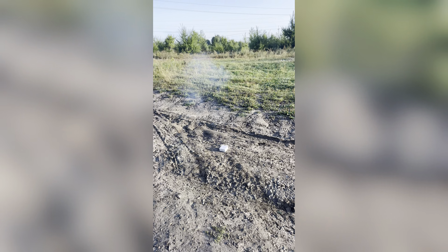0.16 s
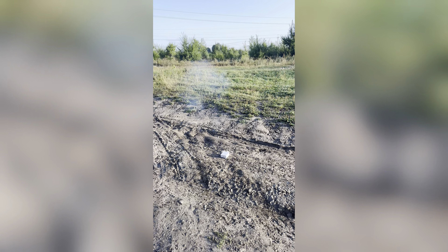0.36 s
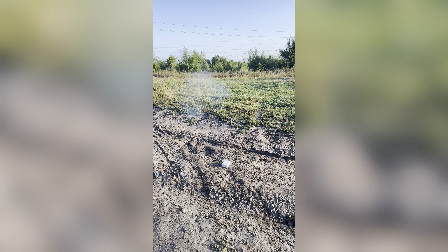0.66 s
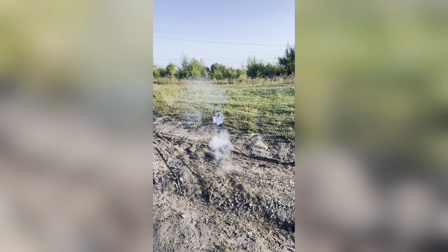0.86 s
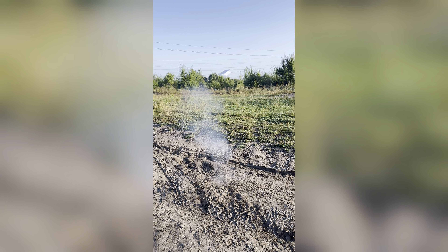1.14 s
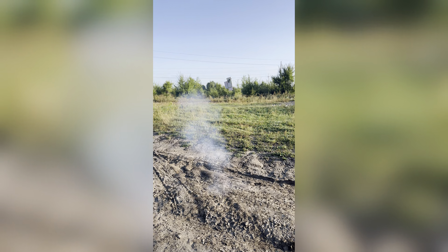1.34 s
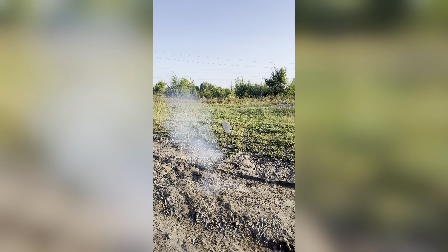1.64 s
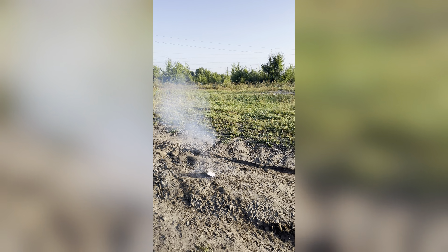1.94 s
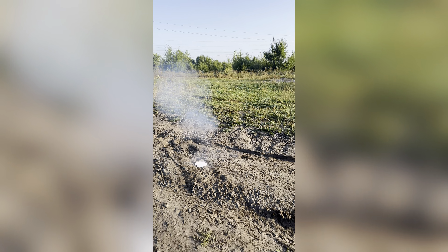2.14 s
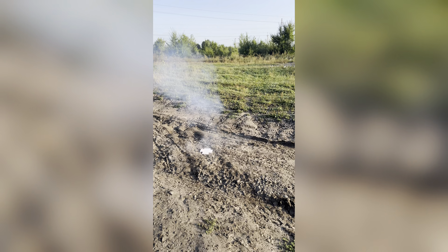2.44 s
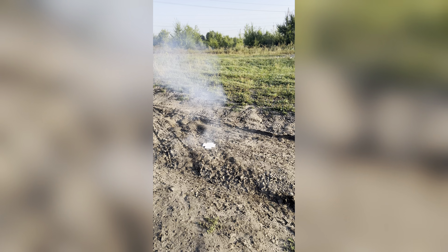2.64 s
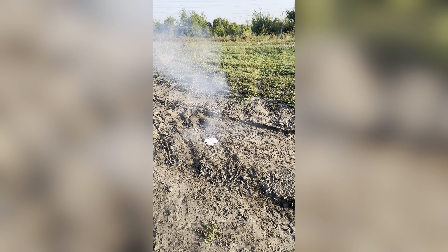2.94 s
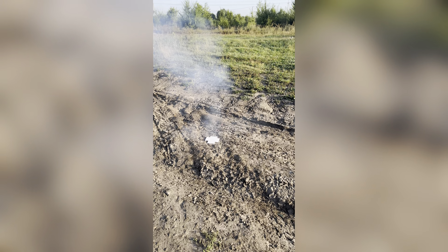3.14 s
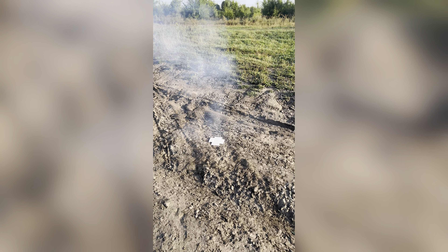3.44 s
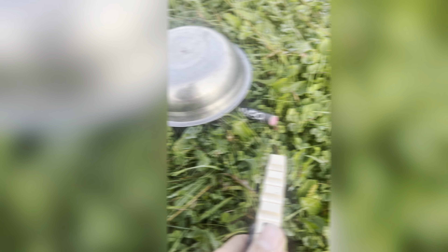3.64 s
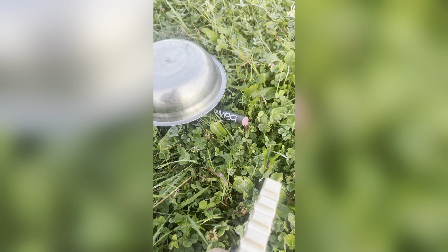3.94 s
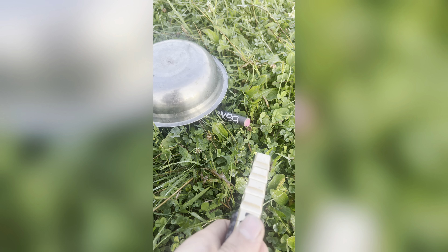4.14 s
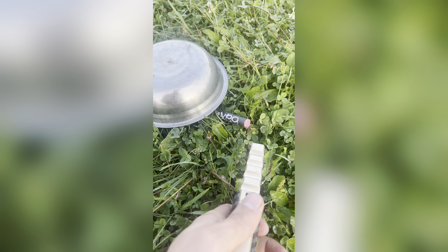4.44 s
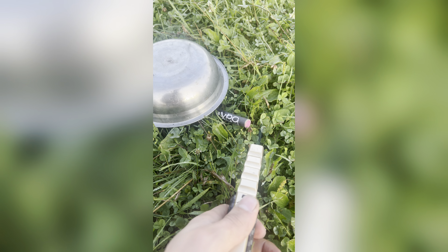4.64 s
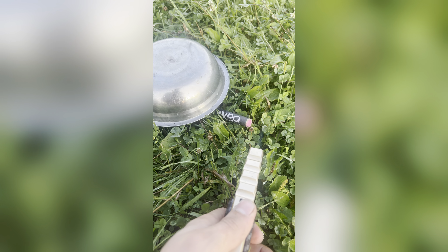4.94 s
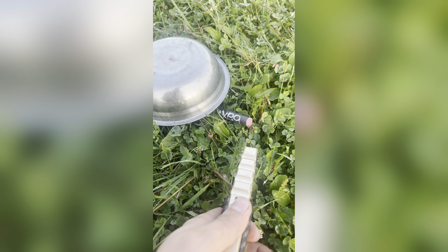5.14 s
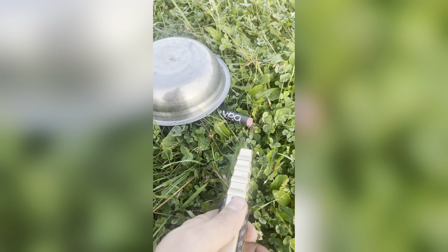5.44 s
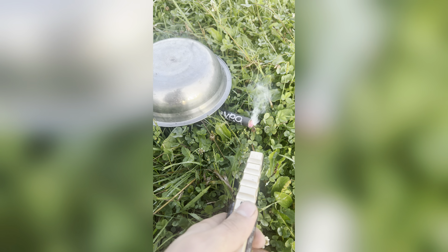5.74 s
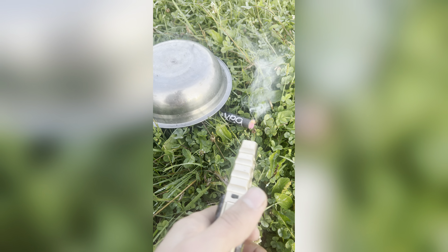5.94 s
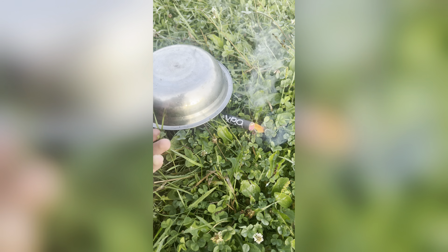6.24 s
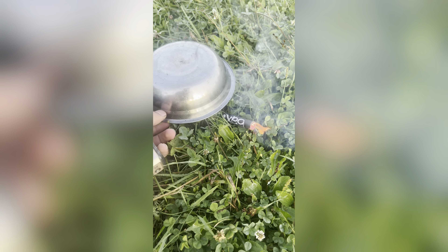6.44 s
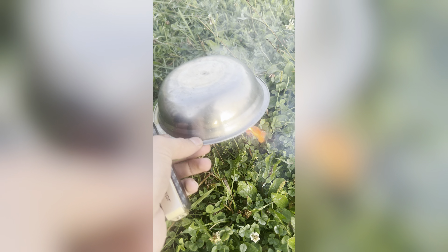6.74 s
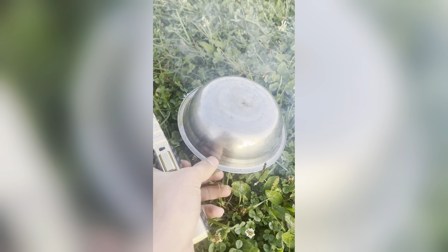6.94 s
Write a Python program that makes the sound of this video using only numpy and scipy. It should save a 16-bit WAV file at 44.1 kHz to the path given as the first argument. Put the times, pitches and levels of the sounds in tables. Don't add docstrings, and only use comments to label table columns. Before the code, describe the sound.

A phone outdoors catches far engine rumble and small birds before a firecracker explodes beneath a thin metal lid, slightly overloading the microphone. A dull echo spreads and fades; the lid lands with knocks and crumbling soil. The scene cuts to a close spot: sharp lighter click, steady windy jet flame, short second hiss, then bright sputtering fuse fizz, turning hollower as the bowl covers it.

```python
import sys
import numpy as np
from scipy import signal
from scipy.fft import rfft, irfft, next_fast_len
from scipy.io import wavfile
from scipy.ndimage import uniform_filter1d, map_coordinates

SR = 44100
rng = np.random.default_rng(int(sys.argv[2]) if len(sys.argv) > 2 else 0)


def linear_from_db(decibels):
    return 10 ** (np.asarray(decibels, float) / 20)


def inscribe(sig):
    pcm = np.round(np.clip(np.atleast_2d(sig).T, -1, 1) * 32767)
    wavfile.write(sys.argv[1], SR, pcm.astype(np.int16))


N = 312669
TIME = np.arange(N) / SR
WHOLE = [(0,), (N / SR,)]
TOP_HZ = 15850
BANG_S, MOVE_S = 0.79, 3.515

# frequency_hz, level_db [per Hz]
ENGINE_SPECTRUM = [(13, -57), (22, -31), (36, -12), (59, 3), (86, -3.5), (119, -7), (200, -17.5),
                   (260, -52), (440, -120)]
ROAD_SPECTRUM = [(110, -33), (180, -5.5), (199, -8), (236, 0.5), (301, -9), (338, -4), (373, -7),
                 (469, -3.5), (574, -6), (844, -3.5), (1540, -12.5), (1940, -21), (2810, -29), (3960, -35),
                 (5500, -45), (7150, -75), (12100, -120)]
GRASS_SPECTRUM = [(76, -35), (130, -9.5), (285, -5.5), (351, -16.5), (387, -12.5), (433, -15.5),
                  (1390, -25.5), (1860, -24.5), (3060, -42), (3420, -46), (6000, -60), (7800, -92),
                  (13200, -120)]
INSECT_SPECTRUM = [(1760, -44.5), (3000, -15.5), (3350, -10.5), (3500, 2), (3650, -10.5), (4280, -10),
                   (4810, -24), (5300, -26.5), (6460, -2.5), (6950, -2.5), (7760, -2), (9680, -17.5),
                   (12500, -23.5), (14000, -50.5)]
# frequency_hz, side_minus_mid_db
FAR_SIDE = [(60, -19), (180, -15), (550, -2), (1650, -4), (4970, 2.5), (15000, -9.5)]
NEAR_SIDE = [(60, -26), (110, -54), (200, -17.5), (380, -17), (700, 2), (1290, -11.5), (2380, -2),
             (4400, -5), (8120, -4.5), (15000, -2.5)]
ENGINE_DB, ROAD_DB, GRASS_DB, INSECTS_DB = -52.5, -56, -57.5, -82
DUCK_DB, DUCK_FULL_S, DUCK_HOLD_S, DUCK_BACK_S = -19, .12, 0.056, 0.13
FIELD_LEFT_DB, ECHO_LEFT_DB = .5, 0.9

# length_s, start_hz, end_hz, bend [above 1 the glide comes early], droop_hz
SLIDE = (.115, 7330, 6500, 1.3, 50)
ARCH = (.066, 3500, 4750, 2.0, 500)
CHIP = (0.034, 2700, 4250, 1.71, 30)
# start_s, level_db, glide_share [part of the glide sung], stretch [ratio]
SLIDE_NOTES = [
    (.022, -73, .45, .8),
    (.165, -69.5, .98, .92),
]
ARCH_NOTES = [
    (.33, -76, 0.95, .95),
    (.478, -79, 1, 0.94),
    (.625, -80, 0.92, 0.92),
]
CHIP_NOTES = [
    (2.474, -82, .9, .6),
    (2.5, -68.5, 1, 0.9),
    (2.665, -81, .9, .6),
    (2.697, -71, 0.74, 1.2),
    (2.745, -82, .35, .7),
    (2.886, -71, .5, 0.4),
]

# start_s, rms_db, centre_hz, width_octaves, t60_s
CLODS = [(.283, -66, 2900, 0.66, .15), (.292, -65, 2500, 0.27, .1), (.7, -72, 4000, .2, .03),
         (1.683, -70, 7500, .2, .03), (1.803, -68, 7960, 0.37, .03), (1.856, -66, 8000, 0.43, .054),
         (1.939, -51, 1100, .6, .025), (1.957, -60, 5000, 1.1, 0.04), (1.965, -61, 6000, 1, .05),
         (2.006, -57, 2900, .6, .012), (2.03, -38.5, 900, 0.7, 0.031), (2.029, -63, 6000, 1, 0.04),
         (2.034, -56, 3800, .6, .04), (2.037, -46.5, 1920, 0.26, 0.043), (2.0565, -34, 4100, 1.2, 0.018),
         (2.06, -41, 3000, 1.3, .018), (2.064, -55, 6100, 0.098, .07), (2.0805, -44.5, 3100, 0.76, 0.022),
         (2.085, -49, 4000, 1.4, 0.022), (2.101, -53, 5500, .35, .02), (2.106, -52, 1500, .8, 0.022),
         (2.109, -54, 5800, .5, .03), (2.118, -61, 5800, .4, 0.026), (2.152, -63, 4800, .3, .03),
         (2.179, -61, 3500, .5, .015), (2.184, -57, 3020, 0.5, 0.02), (2.281, -69, 2800, .7, .012),
         (2.552, -63.5, 2800, .5, .015), (2.653, -66, 2810, .3, .012), (2.765, -65, 7980, .7, 0.018),
         (2.848, -70, 4000, .2, .012), (2.867, -62, 2000, 0.72, 0.017), (3.039, -65, 3494, 0.31, .012),
         (3.471, -70, 7500, .25, .012), (3.507, -64, 4950, 1.1, 0.012), (4.388, -72, 3696, .4, 0.013)]
# start_s, rms_db, centre_hz, width_octaves, t60_s
RUSTLES = [
    (1.82, -65.5, 8550, .6, 0.18),
    (1.957, -41.5, 495, 1.7, 0.089),
    (2.1, -62.5, 5600, 1.0, 0.34),
    (3.74, -77.5, 3680, .3, .5),
    (6.452, -44, 6800, 0.29, .06),
    (6.583, -45, 6000, .8, .05),
    (3.42, -73, 3940, 1.18, 0.66),
    (6.6, -42.5, 514, 0.34, 0.16),
]
# start_s, level_db, pitch_hz, glide_octaves, t60_s
LANDING = [
    (1.9336, -38, 1050, -.2, .018),
    (1.9512, -37, 330, -.12, .045),
    (1.9592, -31, 400, -0.28, .045),
    (2.0292, -30, 510, -1.5, 0.017),
    (2.0586, -20, 1200, -.12, 0.015),
]

# start_s, rms_db, centre_hz, width_octaves, t60_s
FORERUNNER = [
    (.731, -55, 3580, .9, .3),
    (.751, -46, 3493, 0.96, .04),
]
# start_s, rms_db, centre_hz, width_octaves, t60_s
BLAST = [
    (.757, -14.5, 1402, 1.6, .015),
    (.7575, -26, 4604, 0.45, 0.012),
    (.764, -18, 280, 0.56, 0.04),
    (.792, -35, 2800, 0.75, .03),
    (1.2752, -37, 696, .7, .035),
]
# start_s, rms_db, centre_hz, width_octaves, t60_s
CRACK = [
    (.7625, -13.5, 3600, 1.44, 0.012),
    (.7626, -28, 8600, 0.79, .012),
    (1.9338, -47.5, 1800, 2.5, .02),
]
# start_s, level_db, pitch_hz, glide_octaves, t60_s
BOOM = [
    (.7562, -6, 2200, -.089, .018),
    (.7545, -8.5, 760, .2, .03),
    (.7615, -8.5, 1642, 0.073, 0.019),
    (.7632, 1.5, 800, -0.75, .016),
    (.7535, -21.5, 7000, .02, 0.02),
    (.7622, -14, 4900, .01, .014),
    (.7615, -18.5, 7100, .01, .009),
    (.7525, -16.5, 1500, .1, .02),
    (.766, -15, 61, -.3, 0.1),
    (.832, -19, 52, 0.042, 0.2),
]
# start_s, level_db, t60_s, leafiness_db
WALLS = [
    (0.77, -37, 0.34, 1),
    (0.789, -39.5, 0.1, -1),
    (.955, -57.5, 0.33, 11.5),
    (.995, -54, 4.5, 1),
    (1.04, -55.5, 6, 2.5),
    (1.125, -45.5, 3.9, 3),
    (1.385, -53, 0.48, 13),
]
# start_s, rms_db, centre_hz, width_octaves, t60_s
PEALS = [
    (.865, -61, 2700, .2, .2),
    (.972, -59, 6050, .13, .12),
    (.972, -62, 3900, .15, .08),
    (1.12, -58.5, 6100, .13, .2),
    (1.133, -57, 4000, .12, .1),
    (1.19, -45, 550, .5, .06),
    (1.236, -47, 500, 0.45, .06),
    (1.274, -56, 3400, 0.46, .04),
    (1.37, -57, 2350, .1, .06),
    (1.41, -58, 4600, .5, .3),
]
# frequency_hz, level_db [per Hz]
ROLL_SPECTRUM = [(76, -41.5), (130, -13.5), (161, -25), (271, -1.5), (308, -2.5), (706, 2), (1250, -17),
                 (2200, -22), (2860, -51), (4840, -120)]
CRACKLE_SPECTRUM = [(1300, -45), (2000, -14), (2490, 3.5), (2840, 1), (3100, -2), (3990, 3.5), (5200, -9.5),
                    (6760, -40.5), (11400, -120)]
LEAVES_SPECTRUM = [(2820, -34.5), (4800, -4.5), (5450, -4), (6270, 1.5), (7210, -9.5), (8500, -15.5),
                   (11000, -41), (18700, -120)]
AIR_SPECTRUM = [(4590, -30.5), (7800, -1.5), (8990, -3.5), (11500, -2.5), (15800, -10.5)]
# over_roll_db, air_loss_db [per s], leafiness_share
CRACKLE_WAY = (-5, 13, 0.53)
LEAVES_WAY = (-9.5, 29, 1.12)
AIR_WAY = (-6, 22, .3)
SOAK_DB_PER_S = 58
HAZE_DB, HAZE_T60_S = -64.5, 2.6
PEAL_RISE_S, PEAL_SPREAD = 0.0043, .05

# time_s, hiss_db
PRESS = [
    (4.495, -89),
    (4.503, -66),
    (4.509, -48.5),
    (4.56, -39),
    (5.136, -39),
    (5.374, -41),
    (5.552, -40),
    (5.6, -51),
    (5.612, -71),
]
AGAIN = [
    (5.626, -51.5),
    (5.678, -49.5),
    (5.832, -42.5),
    (5.868, -43),
    (5.886, -48.5),
    (5.915, -79),
]
# frequency_hz, level_db [per Hz]
COLD_JET = [(530, -64), (900, -19), (1100, -36), (1320, -37), (2780, -14), (3170, -21), (3840, 5),
            (4820, -6.5), (7880, 0.5), (10000, -14), (10900, -1), (11900, -20), (12600, -32), (13300, -16),
            (15800, -14)]
FRESH_JET = [(1760, -37), (3000, -14), (3260, -34.5), (3910, 2.5), (4070, -2.5), (4370, -15.5), (5230, -18),
             (6310, -13), (7300, -2), (8160, -11), (8940, -13), (10900, -7), (12800, -23), (14300, -17),
             (15800, -24)]
WARM_JET = [(1760, -26), (3000, -1), (3400, -20.5), (3990, 2), (4950, -13), (6810, -5), (8690, -5),
            (9450, -10), (10300, 0.5), (11300, -5), (12200, -17), (14400, -11.5), (15800, -19)]
# frequency_hz, level_db [per Hz]
ROAR_SPECTRUM = [(41, -55), (70, -13), (109, -5.5), (189, -0.5), (312, 1), (379, -1), (560, 0),
                 (775, -15.5), (912, -8), (1070, -11.5), (1260, -21.5), (1560, -14.5), (2660, -14.5),
                 (3240, -32.5), (3400, -24), (4420, -56), (7480, -120)]
LIT_S, OUT_S = 4.57, 5.566
ROAR_DB, DYING_DB_PER_S, BREATH_DB = -33.5, 400, -62
# start_s, rms_db, centre_hz, width_octaves, t60_s
CLICKS = [
    (4.5671, -15, 9000, .6, 0.0035),
    (4.5672, -19.5, 3540, 0.29, .006),
    (5.638, -38, 900, 2, 0.034),
    (5.891, -41, 2100, 0.66, 0.021),
    (5.922, -45.5, 2440, 1.35, 0.011),
    (6.44, -40, 400, 0.94, 0.085),
    (6.452, -46, 2900, .2, .03),
    (6.58, -32, 1160, 1.2, 0.017),
    (7.048, -41, 636, 0.52, 0.05),
]
# start_s, level_db, pitch_hz, glide_octaves, t60_s
KNOCKS = [
    (4.5672, -3, 1860, -0.07, 0.009),
    (4.5662, -4.5, 6200, 0.6, .006),
    (4.568, -30, 5750, -0.1, .07),
    (4.5758, -6, 236, -1.1, 0.035),
    (4.581, -10, 103, -0.7, .056),
    (5.6368, -27, 520, -1.7, .04),
    (6.439, -38, 447, -1.5, 0.07),
    (6.45, -29, 1860, 0.05, 0.032),
    (6.5805, -22.5, 610, -2.5, 0.044),
]

# time_s, fizz_db
FUSE = [
    (5.92, -80),
    (5.945, -59),
    (6.004, -48),
    (6.42, -44.5),
    (6.84, -44.5),
    (7.09, -45),
]
# centre_s, half_length_s, gain_db
FLARES = [
    (6.503, .05, 3),
    (6.692, 0.09, 5.5),
]
# frequency_hz, level_db [per Hz]
CATCH_SPECTRUM = [(2060, -41), (3500, -23), (3800, -8), (4620, -5), (5760, 3), (6290, -1), (9070, 1.5),
                  (12500, -19), (15100, 0), (15800, -13)]
FIZZ_SPECTRUM = [(2060, -35), (3500, -31), (3780, -5), (4100, -14), (5830, 0.5), (7230, -1), (8620, 1),
                 (11500, -5), (12300, -9), (14900, -4), (15800, -10.5)]
SPIT_SPECTRUM = [(590, -50), (1000, -20), (1850, -10), (2010, -13), (2600, -8.5), (3450, -12), (3770, -13),
                 (4500, -9.5), (5850, -24), (9900, -120)]
BURN_SPECTRUM = [(65, -16), (110, 0), (156, -2.5), (453, -7.5), (573, -10), (1400, -22.5), (1820, -50),
                 (3080, -120)]
HOLLOW_SPECTRUM = [(300, -17), (640, 2), (1250, -16), (1800, -10), (2200, -40)]
SPIT_DB, SPIT_FOLLOWS, BURN_DB, BURN_FOLLOWS = -50.5, 0.59, -52.5, 0.4
BOWL_S, BOWL_CLOSE_S, BOWL_DB = 6.78, 0.19, -50
# time_s, dip_hz, depth_db
MIRROR = [
    (5.9, 3480, -11),
    (6.2, 3560, -7),
    (6.33, 3560, -1),
    (6.42, 3600, -7),
    (6.6, 3620, -7),
    (6.72, 3830, -20),
    (6.79, 3850, -12),
    (6.85, 4900, -7),
    (6.95, 5600, -2),
]
MIRROR_HALF_HZ, MIRROR_OCTAVE = 128, 0.33


def unit(x):
    return x / np.sqrt(np.mean(x ** 2) + 1e-20)


def along(points, hz):
    f, v = np.transpose(points)
    return np.interp(np.log(hz + 1), np.log(f + 1), v)


def level_curve(rows):
    s, db = np.transpose(rows)
    return linear_from_db(np.interp(TIME, s, db, -150, -150))


def fade(start_s, length_s):
    return np.clip((TIME - start_s) / length_s, 0, 1)


def wobble(rate_hz):
    knots = rng.standard_normal(int(N * rate_hz / SR) + 4)
    return map_coordinates(knots, [TIME * rate_hz])


def rush(spectrum, side, same, patchy_db, rows, grit=np.ones(N), size=8):
    first, last = int(rows[0][0] * SR), min(int(rows[-1][0] * SR) + 2, N)
    long = next_fast_len(last - first)
    white = rng.standard_normal((2, long + 512)) * np.resize(grit[first:], long + 512)
    z = signal.stft(white, nperseg=512)[2]
    patches = uniform_filter1d(rng.standard_normal(z.shape[1:]), size=6, axis=0)
    patches = uniform_filter1d(patches, size=size, axis=1)
    patchy = signal.istft(z * linear_from_db(patchy_db * unit(patches)), nperseg=512)[1][:, :long]
    a, b = rfft(patchy)
    hz = np.linspace(0, SR / 2, len(a))
    same = np.clip(same, 0, 1)
    across = linear_from_db(along(side, hz)) * (np.sqrt(1 - same) * b - np.sqrt(same) * 1j * a)
    low_cut = hz ** 2 / (hz ** 2 + 30 ** 2)
    colour = linear_from_db(along(spectrum, hz)) * (hz < TOP_HZ) * low_cut
    mid, dif = irfft(colour * [a, across], long)[:, :last - first]
    ports = np.array([mid + dif, mid - dif]) / mid.std()
    return np.pad(ports, ((0, 0), (first, N - last)))


def bursts(rows, rise_s, apart, grit_db):
    out, size = np.zeros((2, N + SR)), SR // 4
    t, hz = (np.arange(size) - size // 4) / SR, np.fft.rfftfreq(size, 1 / SR) + 1
    for s, db, centre_hz, octaves, t60 in rows:
        band = np.exp(-.5 * (np.log2(hz / centre_hz) / octaves) ** 4) / np.sqrt(hz)
        grains = np.repeat(rng.standard_normal(size // 40 + 1), 40)[:size]
        noise = linear_from_db(grit_db * grains) * rng.standard_normal((2, size))
        mid, dif = unit(irfft(rfft(noise) * band, size))
        swell = np.exp(np.minimum(t, 0) / min(rise_s, t60 / 4))
        shape = np.where(t < 0, swell, linear_from_db(-60 * np.maximum(t, 0) / t60))
        gain = linear_from_db(db) * np.linalg.norm(shape) / np.linalg.norm(shape * mid)
        first = round(s * SR) - size // 4
        out[:, first:first + size] += gain * shape * [mid + apart * dif, mid - apart * dif]
    return out[:, :N]


def rings(rows, rise, lag, late_s):
    out, t = np.zeros((2, N + SR)), np.arange(SR // 2) / SR
    for s, db, hz, glide, t60 in rows:
        pitch = hz * 2 ** (glide * (1 - np.exp(-5 * t / t60)))
        port_phase = (lag / 2 + np.pi * hz * late_s) * np.array([[1], [-1]])
        phase = 2 * np.pi * np.cumsum(pitch) / SR + port_phase
        shape = (1 - np.exp(-t / (rise * t60))) * linear_from_db(db - 60 * t / t60)
        first = round(s * SR)
        out[:, first:first + len(t)] += np.sin(phase) * shape
    return out[:, :N]


def field():
    recovery_s = np.maximum(TIME - BANG_S - DUCK_FULL_S - DUCK_HOLD_S, 0)
    duck_db = DUCK_DB * fade(BANG_S, DUCK_FULL_S) * np.exp(-recovery_s / DUCK_BACK_S)
    engines = linear_from_db(ENGINE_DB + 3.5 + .35 * duck_db + 2.0 * wobble(7.0))
    engines = engines * rush(ENGINE_SPECTRUM, FAR_SIDE, .3, patchy_db=1.5, rows=WHOLE)
    standing = rush(ROAD_SPECTRUM, FAR_SIDE, .2, patchy_db=1.8, rows=[(0,), (MOVE_S,)])
    standing = linear_from_db(ROAD_DB + duck_db) * standing
    crouched = rush(GRASS_SPECTRUM, FAR_SIDE, 0.24, patchy_db=1.1, rows=[(MOVE_S,), (N / SR,)])
    crouched = fade(MOVE_S, 0.068) ** 0.17 * linear_from_db(GRASS_DB - 0.62 * (TIME - 4.0)) * crouched
    insects = rush(INSECT_SPECTRUM, FAR_SIDE, .1, patchy_db=2.5, rows=WHOLE)
    insects = linear_from_db(INSECTS_DB + 1.1 * wobble(13)) * insects
    return (engines + standing + crouched + insects) * linear_from_db([[FIELD_LEFT_DB], [-FIELD_LEFT_DB]])


def birds():
    song = np.zeros(N)
    for shape, notes in ((SLIDE, SLIDE_NOTES), (ARCH, ARCH_NOTES), (CHIP, CHIP_NOTES)):
        length_s, from_hz, to_hz, bend, droop_hz = shape
        for s, db, share, stretch in notes:
            u = fade(s, length_s * stretch)
            pitch = to_hz + share * (from_hz - to_hz) * (1 - u) ** bend - droop_hz * u ** 3
            swell = np.abs(np.sin(np.pi * u)) ** 0.57 * (u > 0) * (u < 1)
            song += linear_from_db(db) * swell * np.sin(2 * np.pi * np.cumsum(pitch) / SR)
    hedge = rng.standard_normal((2, SR // 5)) * linear_from_db(-60 * TIME[:SR // 5] / .25)
    smear = signal.fftconvolve(song[None], hedge / np.linalg.norm(hedge[0]), axes=1)[:, :N]
    direct = song * linear_from_db(4 * wobble(140) - 1.5) * linear_from_db([[1.5], [-1.5]])
    return direct + linear_from_db(-2.0) * smear


def debris():
    ticks = bursts(CLODS, 0.0011, apart=0.86, grit_db=3.5)
    rustles = bursts(RUSTLES, 0.015, apart=0.53, grit_db=4.0)
    return ticks + rustles + rings(LANDING, rise=0.062, lag=0.24, late_s=.00004)


def echo(over_db, loss_db_per_s, leafy):
    power = np.zeros(N)
    for s, db, t60, leaf_db in WALLS:
        rise_s = PEAL_RISE_S + PEAL_SPREAD * (s - BANG_S)
        decay_db = 120 * np.maximum(TIME - s, 0) / t60
        power += fade(s - rise_s, 2 * rise_s) ** 2 * linear_from_db(2 * (db + leafy * leaf_db) - decay_db)
    return np.sqrt(power) * linear_from_db(over_db - loss_db_per_s * np.maximum(TIME - BANG_S, 0))


def soak(x):
    hz, t, z = signal.stft(x[:, :3 * SR], SR, nperseg=512)
    loss_db = SOAK_DB_PER_S * (hz[:, None] / 1e4) ** 2 * np.maximum(t - BANG_S, 0)
    heard = signal.istft(z * linear_from_db(-loss_db), SR, nperseg=512)[1][:, :3 * SR]
    return np.pad(heard, ((0, 0), (0, N - 3 * SR)))


def bang():
    path = [(.76,), (2.6,)]
    haze = linear_from_db(HAZE_DB - 60 * (TIME - BANG_S) / HAZE_T60_S)
    scatter = linear_from_db(1.8 * wobble(80))
    back = echo(0, 0, 0) * scatter * rush(ROLL_SPECTRUM, FAR_SIDE, .3, patchy_db=-0.7, rows=path)
    for way, spectrum in ((CRACKLE_WAY, CRACKLE_SPECTRUM), (LEAVES_WAY, LEAVES_SPECTRUM)):
        back += echo(*way) * rush(spectrum, FAR_SIDE, .3, patchy_db=1.5, rows=path)
    air = rush(AIR_SPECTRUM, FAR_SIDE, .3, patchy_db=-0.2, rows=path)
    back += soak(np.hypot(echo(*AIR_WAY), haze) * air)
    back += bursts(PEALS, .012, apart=.8, grit_db=1.5)
    back += bursts(FORERUNNER, .004, apart=.9, grit_db=2.0)
    blast = bursts(BLAST, 0.0031, apart=1.1, grit_db=3.0)
    blast += bursts(CRACK, .00045, apart=1.1, grit_db=1.5)
    boom = rings(BOOM, rise=.04, lag=1.6, late_s=0)
    return blast + boom + back * linear_from_db([[ECHO_LEFT_DB], [-ECHO_LEFT_DB]])


def lighter():
    valve = list(PRESS) + list(AGAIN)
    burn = [(LIT_S,), (AGAIN[-1][0],)]
    roar_db = ROAR_DB - DYING_DB_PER_S * np.maximum(TIME - OUT_S, 0)
    gas, flame = level_curve(valve), linear_from_db(np.maximum(roar_db, BREATH_DB))
    cold = rush(COLD_JET, NEAR_SIDE, 0.74, patchy_db=1.5, rows=valve)
    fresh = rush(FRESH_JET, NEAR_SIDE, 0.74, patchy_db=1.5, rows=valve)
    warm = rush(WARM_JET, NEAR_SIDE, 0.74, patchy_db=1.5, rows=valve)
    lit, heat = fade(4.566, 0.013) - fade(5.6, 0.022), fade(4.99, 0.43)
    hiss = np.sqrt(lit * (1 - heat)) * fresh + np.sqrt(lit * heat) * warm + np.sqrt(1 - lit) * cold
    flutter = linear_from_db(0.77 * wobble(70))
    flutter = flutter / unit(flutter).mean()
    roar = rush(ROAR_SPECTRUM, NEAR_SIDE, 0.65, patchy_db=0.86, rows=burn)
    return gas * hiss + flame * flutter * roar


def handling():
    clicks = bursts(CLICKS, 0.0017, apart=0.63, grit_db=-1.0)
    return clicks + rings(KNOCKS, rise=0.05, lag=.1, late_s=.000047)


def mirrored(x):
    first = int(MIRROR[0][0] * SR)
    hz, t, z = signal.stft(x[:, first:], SR, nperseg=512)
    s, dip_hz, depth_db = np.transpose(MIRROR)
    dip_hz = np.interp(t + first / SR, s, dip_hz)
    depth_db = np.interp(t + first / SR, s, depth_db)

    def dip(multiple):
        return np.exp(-.5 * ((hz[:, None] - multiple * dip_hz) / MIRROR_HALF_HZ) ** 2)

    gain = linear_from_db(depth_db * (dip(1) + MIRROR_OCTAVE * dip(2)))
    heard = signal.istft(z * gain, SR, nperseg=512)[1][:, :N - first]
    return np.pad(heard, ((0, 0), (first, 0)))


def fuse():
    flare_db = sum(db * np.exp(-((TIME - s) / half_s) ** 4) for s, half_s, db in FLARES)
    fizz = level_curve(FUSE) * linear_from_db(flare_db)
    effort = fizz / linear_from_db(-45)
    closed = fade(BOWL_S, BOWL_CLOSE_S)
    spit = linear_from_db(SPIT_DB + 1.4 * wobble(11)) * effort ** SPIT_FOLLOWS
    flame = linear_from_db(BURN_DB + 3.1 * closed) * effort ** BURN_FOLLOWS
    sparks = linear_from_db(0.73 * wobble(900) + 1.04 * wobble(30))
    grown = fade(5.965, 0.22)
    early = rush(CATCH_SPECTRUM, NEAR_SIDE, 0.7, patchy_db=3.0, rows=FUSE, grit=sparks, size=30)
    late = rush(FIZZ_SPECTRUM, NEAR_SIDE, 0.7, patchy_db=3.0, rows=FUSE, grit=sparks, size=30)
    jet = fizz * (np.sqrt(1 - grown) * early + np.sqrt(grown) * late)
    jet += spit * rush(SPIT_SPECTRUM, NEAR_SIDE, 0.95, patchy_db=2.5, rows=FUSE, grit=sparks, size=20)
    jet += linear_from_db(BOWL_DB) * closed * rush(HOLLOW_SPECTRUM, NEAR_SIDE, 0.8, patchy_db=1.5, rows=FUSE)
    return mirrored(jet) + flame * rush(BURN_SPECTRUM, NEAR_SIDE, 0.76, patchy_db=3.0, rows=FUSE)


def scene():
    return field() + birds() + debris() + bang() + lighter() + handling() + fuse()


def thrift(x):
    hz, _, z = signal.stft(np.array([x[0] + x[1], x[0] - x[1]]) / 2, SR, nperseg=1024)
    hz = hz[:, None]
    power = uniform_filter1d(uniform_filter1d(np.abs(z) ** 2, size=7, axis=1), size=7, axis=2)
    mid_db, side_db = 10 * np.log10(np.abs(power) + 1e-16)
    near_db = uniform_filter1d(mid_db, size=45, axis=0)
    wide_db = uniform_filter1d(mid_db, size=120, axis=0)
    sunk = (mid_db < near_db - 6.5) & (hz > 2900) & (hz < 15000)
    loud, top = mid_db > -88, hz > 11500
    drift = uniform_filter1d(rng.standard_normal(mid_db.shape), size=14, axis=0)
    drift = uniform_filter1d(drift, size=12, axis=1)
    sunk |= loud & top & (mid_db - wide_db + 3 * unit(drift[::-1]) < -5.5)
    narrow = side_db - mid_db + 2.5 * unit(drift) < -8 + 3.5 * (hz > 4500)
    mono = narrow & loud & (hz > 1200)
    mid, side = signal.istft(z * [~sunk, ~(sunk | mono)], SR, nperseg=1024)[1][:, :N]
    return np.array([mid + side, mid - side])


def roll_off(x):
    return signal.sosfilt(signal.butter(12, 16660, fs=SR, output="sos"), x)


def record(dry):
    limited = dry / (1 + np.abs(dry) ** 6) ** (1 / 6)
    mix = thrift(limited)
    return roll_off(mix)


dry = scene()
out = record(dry)
inscribe(out)
```